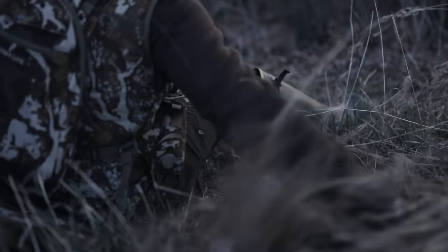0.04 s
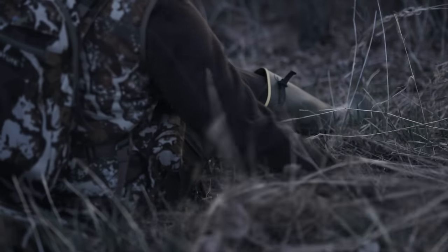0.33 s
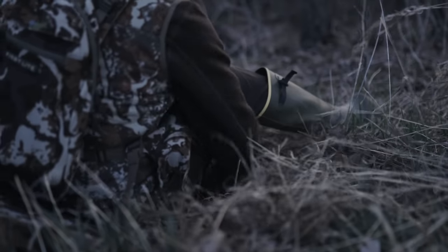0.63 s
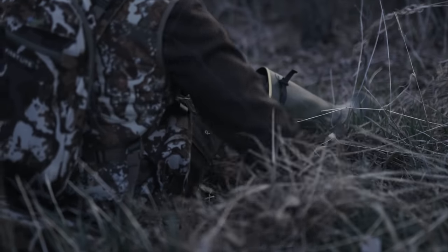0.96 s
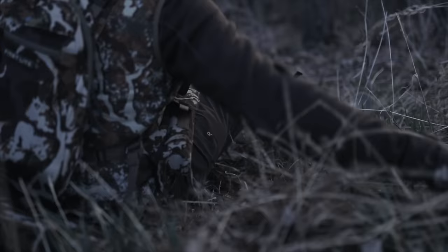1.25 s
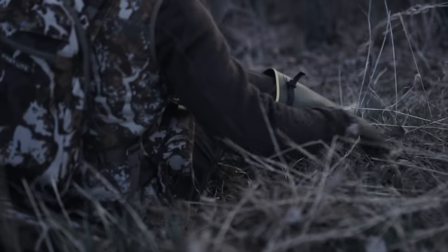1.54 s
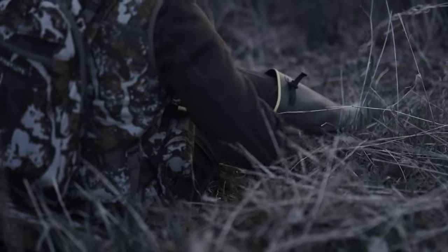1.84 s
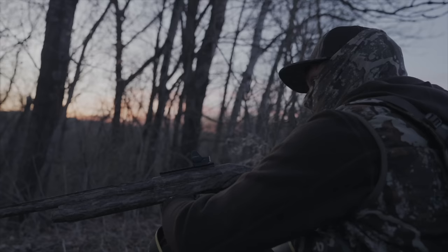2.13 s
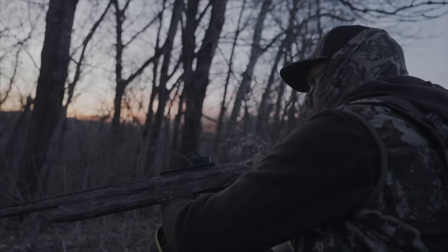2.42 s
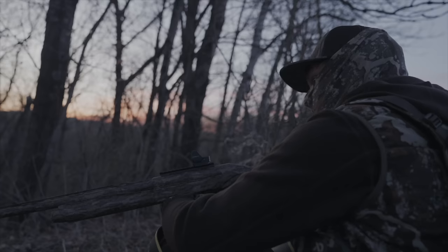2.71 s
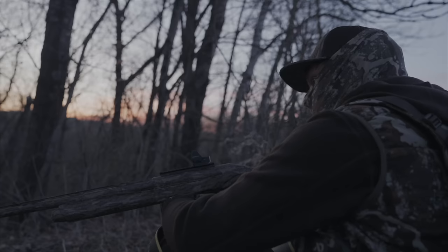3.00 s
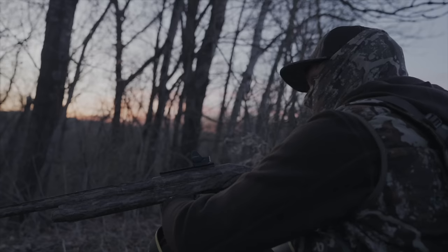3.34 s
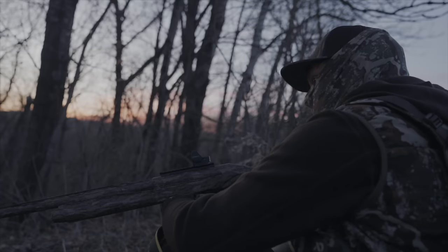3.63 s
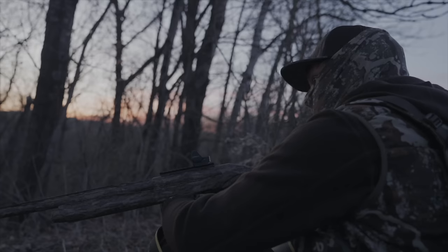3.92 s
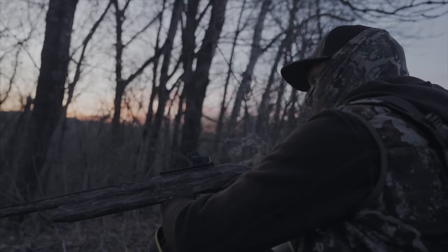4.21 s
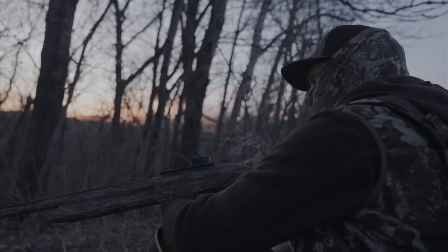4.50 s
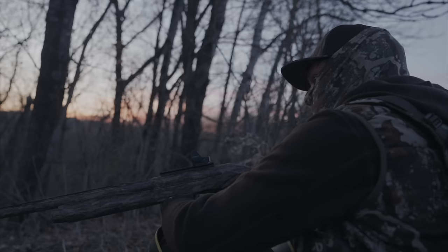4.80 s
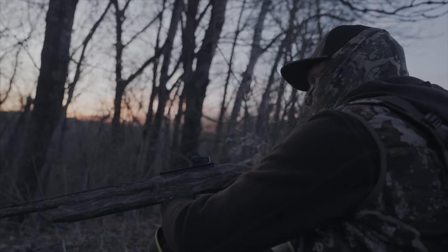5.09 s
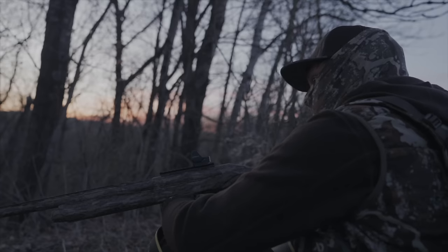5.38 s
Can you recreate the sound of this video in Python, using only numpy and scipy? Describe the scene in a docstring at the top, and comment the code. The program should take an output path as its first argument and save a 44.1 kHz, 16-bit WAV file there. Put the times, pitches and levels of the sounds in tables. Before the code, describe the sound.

An arm sweeps through dry grass and twigs snap while a wild turkey gobbles, echoing among the trees. A hen gives one sharp, loud cluck close by, with faint bird calls far off. After a lull she makes three raspy yelps, amid soft gear taps and low bumps, and a distant gobble just begins. Wind rumbles on the microphone throughout.

```python
"""Bare woods at dusk: an arm sweeps dry grass aside while a wild turkey gobbles from the trees.
A hen gives a sharp cluck and three raspy yelps close by, and a far tom starts to answer.
Each turkey voice is a vibrating membrane and its escaping air, filtered by the throat.
Twigs snap, gear ticks and a shifting body bumps; faint far whistles, one low steady hoot
and a high lisp are heard, while wind rumbles on a nearly mono microphone."""
import sys
import numpy as np
from scipy import signal
from scipy.fft import rfft, irfft, next_fast_len
from scipy.io import wavfile
from scipy.ndimage import uniform_filter1d, map_coordinates

SR = 44100
rng = np.random.default_rng(int(sys.argv[2]) if len(sys.argv) > 2 else 0)


def to_wav(s):
    """Save 16-bit WAV."""
    ch = np.atleast_2d(s).T  # columns
    pcm = np.round(np.clip(ch, -1, 1) * 32767)  # PCM
    wavfile.write(sys.argv[1], SR, pcm.astype(np.int16))


N = 244755

# spectra of a snapping twig, a tap on gear and the hen's breath: frequency_hz, density_db
TWIG_SPECTRUM = [(800, -2.5), (2500, -2.5), (4200, -6.5), (5500, 1), (8300, 3.5), (10500, -6),
                 (15500, -10.5)]
TAP_SPECTRUM = [(250, -49), (500, -16), (830, 12), (1300, 1.5), (1750, -1), (2500, -23), (4000, -24),
                (9000, -32.5)]
HEN_BREATH = [(250, -66), (450, -43.5), (650, -16.5), (1000, 0.5), (1900, 3), (2500, -3.5), (2850, -18),
              (3400, -15.5), (4200, -28.5), (5000, -28.5), (7000, -35.5), (8500, -31), (9600, -35.5),
              (12300, -30), (14000, -43.5)]


def amp(db):
    """Decibels to amplitude ratio."""
    return 10 ** (np.asarray(db) / 20)


def unit(x):
    """Normalise to rms 1."""
    return x / np.sqrt(np.mean(x ** 2) + 1e-20)


def along(points, hz):
    """Interpolate (frequency_hz, value) points on a log frequency axis."""
    knots_hz, values = np.transpose(points)
    return np.interp(np.log(hz + 1), np.log(knots_hz + 1), values)


def curve(points, t):
    """Interpolate (time_s, value) points at the times t."""
    return np.interp(t, *np.transpose(points))


def wobble(rate, size):
    """Smooth random modulation with rate knots a second."""
    knots = rng.standard_normal(int(size * rate / SR) + 4)
    return map_coordinates(knots, [np.arange(size) * rate / SR])


def coloured(x, points):
    """Filter x by a (frequency_hz, gain_db) response and normalise to rms 1."""
    n = x.shape[-1]
    m = next_fast_len(n + 8192)
    response = amp(along(points, np.fft.rfftfreq(m, 1 / SR)))
    return unit(irfft(rfft(x, m) * response, m)[..., :n])


def noise(points, size):
    """Gaussian noise with the given spectrum."""
    return coloured(rng.standard_normal(size), points)


def low_pass(x, hz):
    """Zero-phase filtering keeps what lies below hz."""
    return signal.sosfiltfilt(signal.butter(4, hz, fs=SR, output="sos"), x)


def swell(t, length, attack_s, release_s):
    """An envelope that rises from time 0, holds until length, then releases."""
    rise = np.clip(t / attack_s, 0, 1)
    fall = np.clip(1 - (t - length) / release_s, 0, 1)
    return np.sin(np.pi / 2 * rise * fall) ** 2


def add(track, start_s, x):
    """Superpose x on the track from start_s."""
    i = max(0, round(start_s * SR))
    track[i:i + len(x)] += x[:max(0, len(track) - i)]


def wind():
    """Turbulent pressure buffets and rumbles on the microphone, over the broadband hush of the woods."""
    # envelopes: time_s, level_db
    buffet_levels = [(0.0, -37), (0.14, -32), (0.2, -16.5), (0.8, -44), (1.12, -21), (1.3, -36.5),
                     (1.7, -29.5), (1.74, -34), (2.0, -30.5), (4.41, -34), (4.54, -13.5), (4.81, -31),
                     (5.1, -24), (5.2, -30), (5.26, -17.5), (5.38, -15.5), (5.44, -37.5), (5.52, -27)]
    rumble_levels = [(0.0, -56.5), (0.37, -54), (0.73, -57.5), (1.36, -50), (2.7, -50.5), (2.86, -60.5),
                     (3.26, -56.5), (3.57, -62.5), (4.4, -56), (4.53, -46), (4.78, -52.5), (5.55, -50)]
    hush_levels = [(0, -57.5), (2.2, -54.5), (2.8, -59.5), (3.3, -59.5), (3.9, -62), (5.55, -61.5)]
    # spectra: frequency_hz, density_db
    buffet_spectrum = [(2, -10.5), (7, 1.5), (13, -3.5), (25, -3), (45, -24.5), (80, -31), (200, -96)]
    rumble_spectrum = [(20, -4), (50, -0.5), (80, -7.5), (130, -17), (220, -28), (400, -34.5), (1000, -100)]
    hush_spectrum = [(250, -57), (420, -20), (632, -3), (781, -2.5), (818, 1.5), (1090, 0), (1850, -5),
                     (2000, -4), (2320, -6), (2700, -5.5), (4010, -14), (4520, -18), (8800, -12.5),
                     (15600, -26)]
    t = np.arange(N) / SR
    gusts = amp(4 * wobble(11, N))
    buffet_gain = np.sqrt(gusts) * amp(curve(buffet_levels, t) + 2)
    rumble_gain = gusts * amp(curve(rumble_levels, t) + 8.5)
    hush = amp(curve(hush_levels, t) + .6 * wobble(5.7, N)) * noise(hush_spectrum, N)
    mid, side = (buffet_gain * noise(buffet_spectrum, N) + rumble_gain * noise(rumble_spectrum, N)
                 for _ in range(2))
    return mid + hush + amp(-23.5) * side * np.array([[1], [-1]])


def grass():
    """Friction: dry stalks rub under a sleeve in clumps, a few crackling; their powers add."""
    # sweeps of the arm: full_speed_s, hold_s, level_db
    sweeps = [(0.0, 0.11, -37), (0.316, 0.3, -33), (1.14, 0.049, -31), (1.39, 0.16, -45)]
    # dry stalks: frequency_hz, density_db
    straw_spectrum = [(88, -35.5), (150, -5), (213, -9), (645, -1.5), (739, -5), (814, -2), (1050, -2.5),
                      (1130, -1), (2620, -2), (5920, -0.5), (6650, -4), (8400, 2.5), (10200, -9.5),
                      (13100, -5.5), (15600, -11.5)]
    rise_db_per_s, sag_db_per_s, fall_db_per_s = 99.5, 21.5, 138
    t = np.arange(N) / SR
    # bent stalks creep back, then lie still
    power = amp(-58 - 1.5 * t - 54 * np.maximum(t - 2.55, 0)) ** 2
    for full_speed_s, hold_s, level_db in sweeps:
        since = t - full_speed_s
        drop_db = (rise_db_per_s * np.maximum(-since, 0) + sag_db_per_s * np.clip(since, 0, hold_s)
                   + fall_db_per_s * np.maximum(since - hold_s, 0))
        power += amp(level_db - drop_db) ** 2
    clumps = amp(1.37 * wobble(60, N) + 1.8 * wobble(1500, N))
    crackle = (rng.random(N) < 120 / SR) * rng.standard_normal(N)
    rubbing = rng.standard_normal(N) * clumps
    return np.sqrt(power) * coloured(rubbing + amp(5.5) * crackle, straw_spectrum)


def bumps():
    """Damped oscillation: each shift of body weight gives a low, short push."""
    # shifts of weight: start_s, level_db, pitch_hz
    shifts = [(0.19, -23, 48.6), (1.659, -25.5, 66.6), (2.79, -44.5, 146), (4.469, -30, 64),
              (4.534, -24.5, 55.6), (4.613, -24, 61), (4.69, -28.5, 51), (5.105, -30.5, 126.8)]
    # the noisy part of a bump: frequency_hz, density_db
    thud_spectrum = [(30, -5), (70, 28.5), (140, 7), (350, -49.5), (1500, -100)]
    t60_s, attack_s = .23, .007
    out, t = np.zeros(N), np.arange(SR // 5) / SR
    for start_s, level_db, pitch_hz in shifts:
        push = np.sin(2 * np.pi * pitch_hz * t) + .5 * noise(thud_spectrum, len(t))
        envelope = amp(level_db + 1.5 - 60 * t / t60_s) * (1 - np.exp(-t / attack_s))
        add(out, start_s, envelope * push)
    return out


def knocks(events, spectrum, t60_s, gain_db):
    """Heavily damped impacts: each (time_s, level_db) is a burst of exponentially decaying noise."""
    out, t = np.zeros(N), np.arange(SR // 10) / SR
    envelope = amp(-60 * t / t60_s) * (1 - np.exp(-t / .0003))
    for time_s, level_db in events:
        burst = coloured(rng.standard_normal(len(t)) * envelope, spectrum)
        add(out, time_s - .001, amp(level_db + gain_db) * burst / np.abs(burst).max())
    return out


def twig_snaps():
    """Brittle fracture: stalks and twigs break with a bright click and hardly ring."""
    # breaks: time_s, level_db
    snaps = [(0.2776, -19.5), (1.3674, -33), (1.4513, -24), (1.479, -27.5), (1.5124, -29), (2.131, -36),
             (2.681, -43.5), (3.06, -42), (5.0089, -37.5), (5.0386, -40), (5.104, -35), (5.1178, -34),
             (5.1396, -27), (5.185, -43.5)]
    return knocks(snaps, TWIG_SPECTRUM, t60_s=.034, gain_db=-.5)


def syrinx(pitch, rasp, partials, throat, breath, jitter, jitter_rate, air_share, shudder_db):
    """Source and filter: a membrane tone shudders with rasp (0-1), and air escapes once a cycle."""
    n, rasp = len(pitch), np.clip(rasp, 0, 1)
    unsteady_hz = pitch * (1 + jitter * np.sqrt(rasp) * wobble(jitter_rate, n))
    phase = 2 * np.pi * np.cumsum(unsteady_hz) / SR
    membrane = np.zeros(n)
    for harmonic, level_db in partials:
        gain = amp(level_db + shudder_db * rasp * wobble(jitter_rate, n))
        membrane += gain * np.cos(harmonic * phase + 2 * np.pi * rng.random())
    air = coloured(rng.standard_normal(n) * (1 + .5 * np.cos(phase)), breath)
    share = np.clip(air_share * rasp, 0, 1)
    voice = np.sqrt(1 - share) * coloured(membrane, throat) + np.sqrt(share) * air
    # the membrane's swing is bounded: rasp changes the colour more than the strength
    power = uniform_filter1d(uniform_filter1d(voice ** 2, size=90), size=60)
    return unit(voice / np.sqrt(np.abs(power) + .2))


def tom_note(pitch, rasp, partials):
    """Formant filtering: the tom's throat shapes both tone and breath of a soft-edged note."""
    # throat response: frequency_hz, gain_db
    throat = [(250, -13), (420, -19.5), (540, 1), (720, -8), (860, 1), (1000, 3), (1180, -4), (1420, -4),
              (1800, -17.5), (2130, -7), (2350, -24.5), (2550, -11), (2750, -19), (2970, -4.5),
              (3200, -17.5), (7000, -36.5)]
    voice = syrinx(pitch, rasp, partials, throat, throat,
                   jitter=.041, jitter_rate=450, air_share=.75, shudder_db=6)
    return voice * signal.windows.tukey(len(pitch), .5)


def gobble():
    """Hooked syllables tumble among yodels; period doubling adds lines between their harmonics."""
    # throaty syllables: start_s, length_s, level_db
    syllables = [(1.076, 0.029, -40), (1.163, .058, -38.5), (1.254, .028, -34.5), (1.303, 0.031, -34.5),
                 (1.341, 0.042, -36.5), (1.379, 0.06, -33), (1.464, 0.029, -35), (1.545, 0.061, -31.5),
                 (1.634, 0.036, -33.5), (1.679, 0.027, -35), (1.736, 0.037, -35), (1.8, .032, -35),
                 (1.842, 0.031, -33.5), (1.878, 0.048, -34), (1.954, 0.023, -32.5), (2.023, 0.04, -32),
                 (2.1, 0.027, -33.5)]
    # their partials: multiple_of_half_pitch, level_db
    partials = [(2, 6), (3, 0.5), (4, -17), (5, -20), (6, -10), (7, -16), (8, -6.5), (9, -25), (10, -18),
                (11, -18)]
    # clear notes, each arched about a straight glide: start_s, glide_from_hz, glide_to_hz, level_db
    yodels = [(1.092, 1147, 1200, -35.5), (1.096, 1760, 1625, -34), (1.172, 1190, 1280, -30),
              (1.235, 1240, 1212, -36.5), (1.502, 1550, 1284, -34), (1.667, 1530, 1346, -35.5),
              (1.788, 1395, 1480, -42), (1.823, 1487, 1420, -38), (1.941, 1404, 1480, -44)]
    first_hz, sag_hz_per_s, scoop_s, hook_s, yodel_s = 660, 110, .04, .02, .028
    out = np.zeros(N)
    for start_s, length_s, level_db in syllables:
        # the pitch scoops up to its top, then hooks down as the voice clears
        to_hook_s = length_s - hook_s - np.arange(0, length_s, 1 / SR)
        scoop = np.clip(to_hook_s / scoop_s, 0, 1)
        hook = np.clip(-to_hook_s / hook_s, 0, 1)
        top_hz = first_hz - sag_hz_per_s * (start_s - syllables[0][0])
        pitch = top_hz * (1 - .07 * scoop - .17 * hook)
        rasp = np.interp(hook, [0, .5], [.74, .1])
        add(out, start_s, amp(level_db + .75 - .5 * hook) * tom_note(pitch / 2, rasp, partials))
    arch = 1 - .06 * np.linspace(-1, 1, int(yodel_s * SR)) ** 2
    for start_s, glide_from_hz, glide_to_hz, level_db in yodels:
        pitch = np.linspace(glide_from_hz, glide_to_hz, len(arch)) * arch
        add(out, start_s, amp(level_db) * tom_note(pitch, rasp=.11, partials=[(1, -4), (2, -9.5)]))
    return out


def woods(x, build_s):
    """Reverberation: trunks scatter a sound into a soft tail whose highest treble dies first."""
    # reverberation times: frequency_hz, t60_s
    decay_times = [(200, 0.58), (900, 1), (1700, 0.52), (3500, 0.99), (7000, 0.46), (14000, .12)]
    colour = [(300, -14.5), (800, -1), (1250, -2), (1750, 7.5), (2800, -2), (6000, 10), (14000, -6)]
    hz, t, bands = signal.stft(rng.standard_normal(SR), SR, nperseg=256)
    envelopes = amp(-60 * t / along(decay_times, hz)[:, None]) * (1 - np.exp(-t / build_s))
    tail = coloured(signal.istft(bands * envelopes, SR, nperseg=256)[1], colour)
    return signal.fftconvolve(x, tail / np.linalg.norm(tail))[:N]


def distant_calls():
    """Faint far whistles and one low steady hoot are pure tones; a high lisp is a band of noise."""
    # whistles and the hoot: start_s, length_s, first_hz, middle_hz, last_hz, level_db
    calls = [(2.292, 0.08, 1870, 1860, 1464, -56.5), (2.375, 0.33, 810, 870, 818, -46.5),
             (2.88, 0.204, 2500, 2470, 2400, -70), (3.1, .45, 2620, 2770, 2680, -74.5)]
    out = np.zeros(N)
    for start_s, length_s, *pitches, level_db in calls:
        progress = np.linspace(0, 1, int(length_s * SR))
        pitch = np.polyval(np.polyfit([0, .5, 1], pitches, 2), progress)
        tone = unit(np.sin(2 * np.pi * np.cumsum(pitch) / SR))
        add(out, start_s, amp(level_db) * tone * signal.windows.tukey(len(tone), .4))
    n = int(.16 * SR)
    flicker = amp(-54 + 4.3 * wobble(60, n))
    lisp = noise([(5500, -38), (7800, 1), (11000, -5.5), (13000, -25)], n)
    add(out, 2.585, flicker * lisp * signal.windows.tukey(n, .9))
    return out


def hen_note(pitch, rasp, jitter, air_share, bright_db):
    """Formant filtering by the hen's throat; the treble gain follows bright_db through the note."""
    # membrane partials: harmonic, level_db
    partials = [(1, -10), (2, 3.5), (3, -12), (4, -14), (5, -31), (6, -15), (7, -13.5)]
    # throat response: frequency_hz, gain_db
    throat = [(250, -44), (480, -6), (650, -7.5), (1200, 5.5), (1900, 1), (2450, -8), (2850, -26),
              (3400, -5.5), (4500, -9), (6500, -28.5), (15000, -34)]
    voice = syrinx(pitch, rasp, partials, throat, HEN_BREATH, jitter,
                   jitter_rate=300, air_share=air_share, shudder_db=12)
    dull = low_pass(voice, hz=2920)
    treble_db = np.interp(np.linspace(0, 1, len(pitch)), np.linspace(0, 1, len(bright_db)), bright_db)
    return dull + amp(treble_db) * (voice - dull)


def nasal(x, gain):
    """A nasal resonance, opened by gain, reinforces one narrow band."""
    return x + gain * signal.lfilter(*signal.iirpeak(3230, Q=5.9, fs=SR), x)


def cluck():
    """An accelerating upward glide with a hard onset, roughest in mid-flick."""
    # the close cluck: start_s, length_s, level_db
    call = (2.4535, .042, -12.5)
    start_s, length_s, level_db = call
    from_hz, to_hz, attack_s, release_s, accent_s = 615, 996, .0071, .0032, .012
    out, t = np.zeros(N), np.arange(0, length_s + release_s, 1 / SR)
    progress = np.minimum(t / length_s, 1)
    pitch = from_hz + (to_hz - from_hz) * progress ** 1.8
    rasp = .79 * np.sin(np.pi * progress)
    note = hen_note(pitch, rasp, jitter=.034, air_share=.27, bright_db=[3.5, 5, 0, -1.5, -8])
    note = nasal(note, amp(-4.5) * np.sin(np.pi * progress ** 2))
    accent_db = 5.5 * (np.exp(-(t / accent_s) ** 4) - .5)
    envelope = swell(t, length_s - release_s / 2, attack_s, release_s)
    add(out, start_s, amp(level_db + accent_db) * envelope * note)
    return out


def nearby_trunks(x):
    """Early reflections: the ground and close trunks return a short, diffuse scatter."""
    t60_s, build_s = .076, .0035
    t = np.arange(SR // 8) / SR
    scatter = rng.standard_normal(len(t)) * amp(-60 * t / t60_s) * (1 - np.exp(-t / build_s))
    return signal.fftconvolve(x, scatter / np.linalg.norm(scatter))[:N]


def litter():
    """Random impulses: faint leaf ticks and cloth creaks while the sitter keeps still."""
    from_s, to_s = 2.75, 5.35
    when, strength = rng.random((30, 2)).T
    events = np.column_stack([from_s + (to_s - from_s) * when, -59.5 + 17 * strength ** 2])
    leaves = knocks(events[::2], TWIG_SPECTRUM, t60_s=.017, gain_db=2.5)
    cloth = knocks(events[1::2], TAP_SPECTRUM, t60_s=.04, gain_db=1)
    return leaves + cloth


def gear_taps():
    """Soft contacts of gear and clothing excite little treble and are quickly damped."""
    # contacts: time_s, level_db
    taps = [(2.985, -43), (3.059, -39.5), (3.143, -38), (3.671, -44), (4.011, -29.5), (4.562, -21.5),
            (4.924, -35), (5.009, -37), (5.08, -32), (5.296, -36.5)]
    return knocks(taps, TAP_SPECTRUM, t60_s=.033, gain_db=-3)


def yelp(t, length_s, break_s, high_hz, low_hz, rattle_hz):
    """A register break drops the pitch; a slow second vibration modulates it ever more deeply."""
    flip_s, surge_s, nasal_s, sag_octaves_per_s = .0023, .015, .023, 3.16
    since, progress = t - break_s, np.clip(t / length_s, 0, 1)
    broken = .5 + .5 * np.tanh(since / flip_s)  # 0 in the high register, 1 in the low
    depth = .61 * progress
    rattle_phase = 2 * np.pi * rattle_hz * (t - length_s) + .4 * wobble(46, len(t))
    pitch = (high_hz + (low_hz - high_hz) * broken) * 2 ** (-sag_octaves_per_s * since)
    pitch *= 1 - .11 * depth * np.sin(rattle_phase)
    rasp = .51 - .13 * broken + .54 * np.exp(-(since / surge_s) ** 2)
    note = hen_note(pitch, rasp, jitter=.039, air_share=.42, bright_db=[-26, -4, 0, 6.5, 12])
    note = nasal(note, amp(7.5) * np.exp(-(since / nasal_s) ** 2))
    mouth_closing = .83 * progress ** 2
    note += mouth_closing * (low_pass(note, hz=2150) - note)
    return note * (1 + depth * np.cos(rattle_phase)) / np.sqrt(1 + depth ** 2 / 2)


def hen_yelps():
    """Three pushes of effort, radiated by a small mouth that passes no bass and little top treble."""
    # yelps: start_s, length_s, break_s (after the start), high_hz, low_hz, level_db, rattle_hz
    calls = [(4.139, 0.066, .02, 737.3, 602, -17, 89.6), (4.435, 0.0794, .036, 831.3, 660, -18, 70.3),
             (4.736, 0.088, .024, 906.7, 663.7, -16, 95)]
    lead_s, trail_s, fade_db_per_s = .01, .028, 32
    out = np.zeros(N)
    for start_s, length_s, break_s, high_hz, low_hz, level_db, rattle_hz in calls:
        t = np.arange(-lead_s, length_s + trail_s, 1 / SR)
        weak_voicing = amp(-17.5) * signal.windows.tukey(len(t), .2)
        effort = np.hypot(swell(t, length_s, attack_s=.008, release_s=.0065), weak_voicing)
        envelope = amp(level_db - fade_db_per_s * (t - break_s)) * effort
        add(out, start_s + t[0], envelope * yelp(t, length_s, break_s, high_hz, low_hz, rattle_hz))
    # the first yelp starts as a hiss before the tone catches
    n = int(.046 * SR)
    add(out, 4.106, amp(np.linspace(-44, -40, n)) * noise(HEN_BREATH, n) * signal.windows.tukey(n, .1))
    return signal.sosfiltfilt(signal.butter(4, [510, 13000], "bandpass", fs=SR, output="sos"), out)


def far_tom():
    """Frequency modulation makes the warble of a distant gobble, blurred by the trees."""
    # envelope: time_s, level_db
    levels = [(5.36, -74), (5.39, -44.5), (5.53, -42.5)]
    # the voice at a distance: frequency_hz, gain_db
    colour = [(400, -30), (800, -25), (1150, 2), (1400, -3), (1700, -7), (2100, -18), (3000, -33),
              (6000, -83)]
    centre_hz, warble_hz = 580, 14
    out, t = np.zeros(N), np.arange(levels[0][0], N / SR, 1 / SR)
    pitch = centre_hz * (1 + .042 * np.sin(2 * np.pi * warble_hz * (t - t[0])))
    voice = syrinx(pitch, rasp=.55, partials=[(2, 4), (3, -3)], throat=colour, breath=colour,
                   jitter=.0236, jitter_rate=196, air_share=.92, shudder_db=10)
    add(out, t[0], amp(curve(levels, t) + 2.5 * wobble(121, len(t))) * voice)
    return out


def scene():
    """Direct and scattered sound add: the near hen is almost dry, the first tom washed in echo."""
    sharp, yelps, tom = cluck(), hen_yelps(), gobble()
    echoes = (amp(-21.5) * woods(sharp, build_s=.005) + amp(-28) * woods(yelps, build_s=.0089)
              + amp(-5.5) * woods(tom, build_s=.0045))
    early = amp(-10.5) * nearby_trunks(yelps) + amp(-29.5) * nearby_trunks(sharp)
    ticks = twig_snaps() + gear_taps()
    voices = sharp + yelps + amp(-2) * tom + far_tom() + distant_calls()
    return voices + early + echoes + grass() + ticks + litter() + bumps() + wind()


def record(dry):
    """Band limiting: nothing above top_hz is kept."""
    top_hz = 15800
    m = next_fast_len(N + SR // 2)
    return irfft(rfft(dry, m) * (np.fft.rfftfreq(m, 1 / SR) < top_hz), m)[..., :N]


dry = scene()
out = record(dry)
to_wav(out)
```